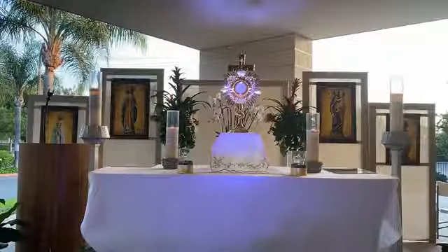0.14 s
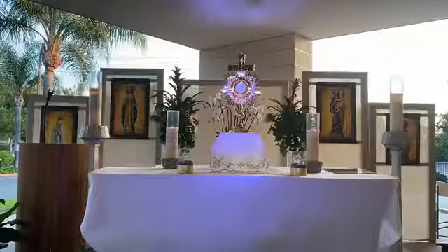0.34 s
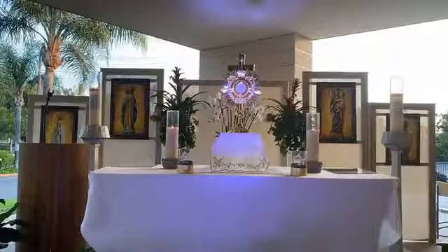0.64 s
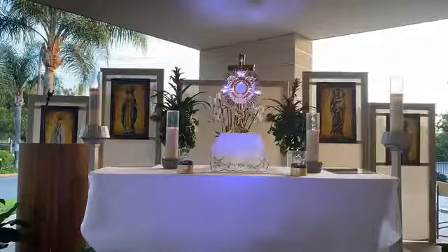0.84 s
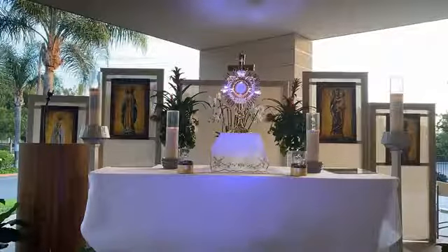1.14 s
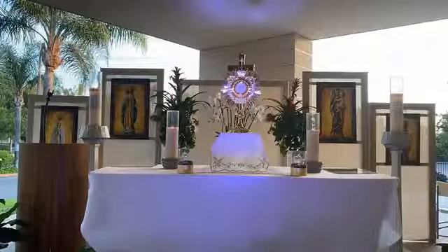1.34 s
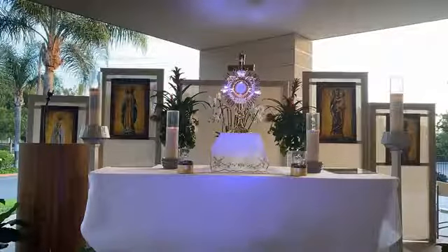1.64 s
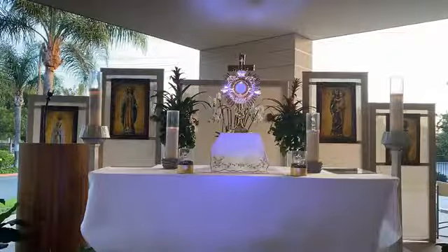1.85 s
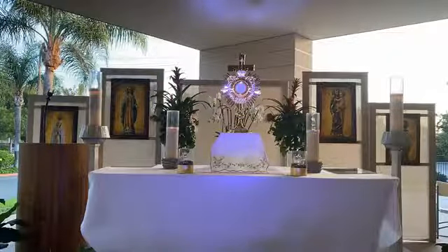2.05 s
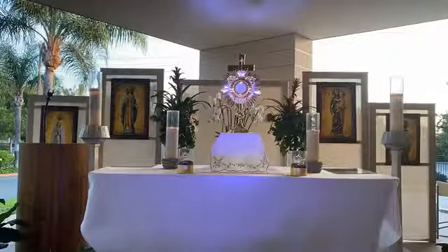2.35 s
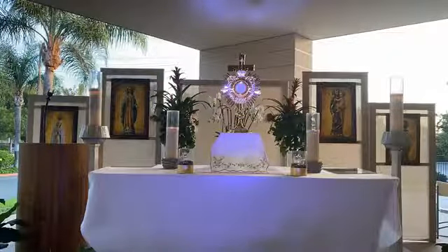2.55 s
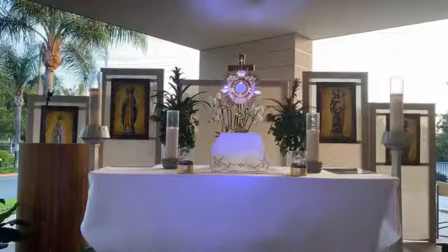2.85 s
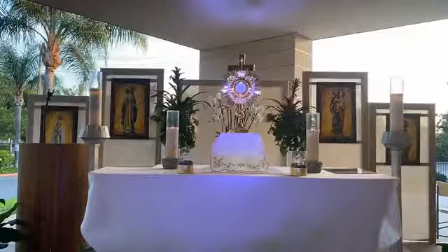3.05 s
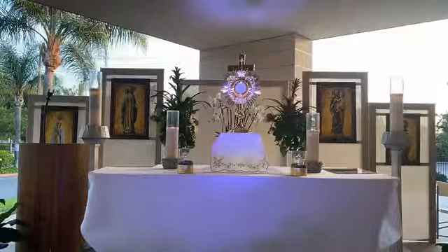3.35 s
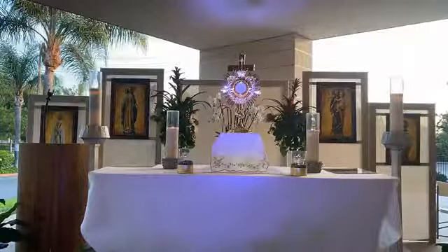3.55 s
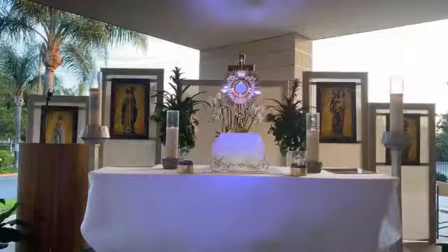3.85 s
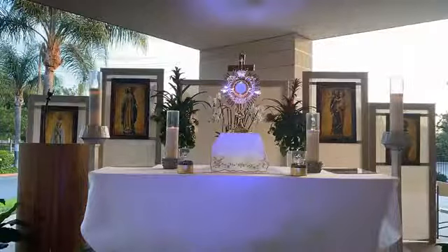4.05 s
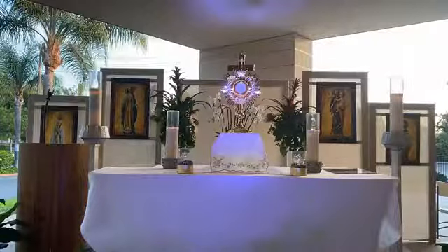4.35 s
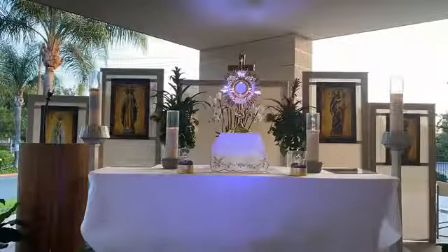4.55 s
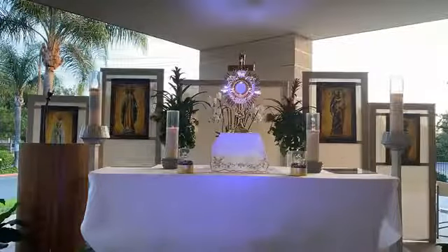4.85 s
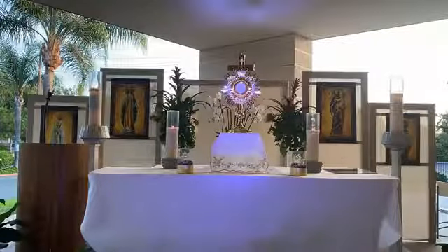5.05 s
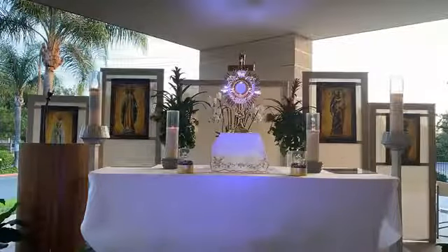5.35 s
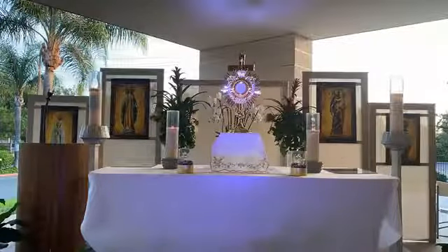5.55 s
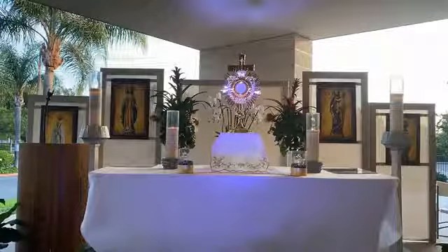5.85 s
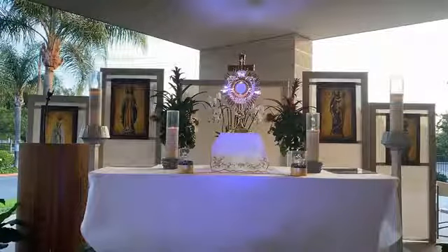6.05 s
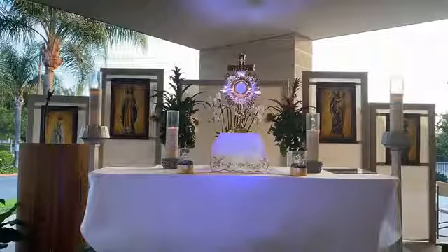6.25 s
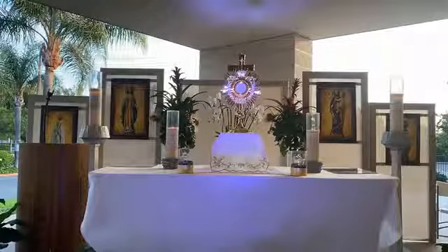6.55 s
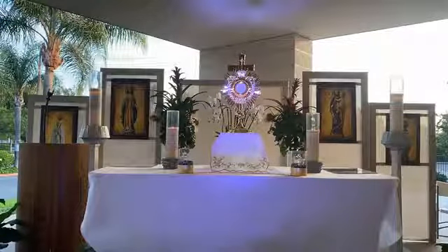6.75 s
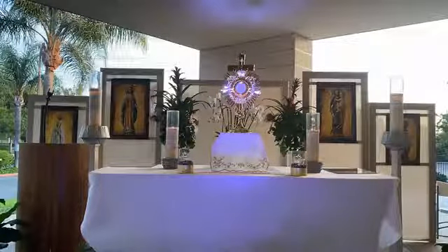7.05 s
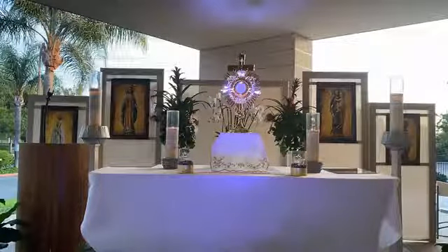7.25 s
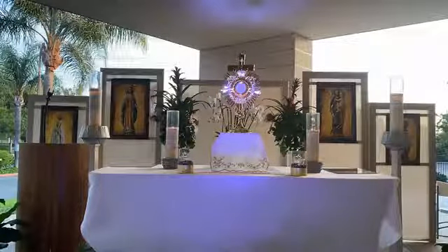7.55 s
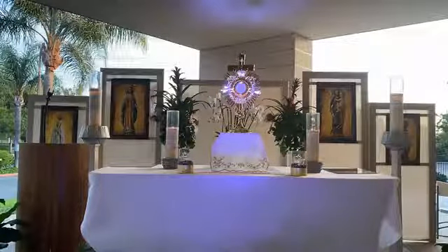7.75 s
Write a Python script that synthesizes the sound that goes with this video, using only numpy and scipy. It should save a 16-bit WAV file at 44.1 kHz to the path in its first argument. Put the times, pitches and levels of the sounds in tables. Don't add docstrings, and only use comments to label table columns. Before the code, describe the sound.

Constant broadband air hiss with wavering motor hum and thin, swelling fan whistles, over the soft low rumble of far road traffic. An engine note throbs past at the start, dips, returns weakly and fades away. Very low wind flutter presses on the single microphone, peaks past the middle, then dies. A farther engine shows briefly near six and seven seconds. Open-sided roofed place, nobody heard.

```python
import sys
import numpy as np
from scipy import signal
from scipy.fft import rfft, irfft
from scipy.io import wavfile
from scipy.ndimage import uniform_filter1d, map_coordinates

SR = 44100
rng = np.random.default_rng(int(sys.argv[2]) if len(sys.argv) > 2 else 0)


def output_pcm(signal):
    pcm = np.clip(np.atleast_2d(signal).T, -1, 1) * 32767
    wavfile.write(sys.argv[1], SR, np.round(pcm).astype(np.int16))


def elevation(decibels):
    levels = np.asarray(decibels, float)
    return 10 ** (levels / 20)


N = 347949


def in_time(rows):
    times_s, *columns = np.transpose(rows)
    return [np.interp(np.arange(N) / SR, times_s, column) for column in columns]


def coloured(spectrum):
    hz, db = np.transpose(spectrum)
    bins_hz = np.arange(N // 2 + 1) * SR / N + 1e-3
    gain = elevation(np.interp(np.log(bins_hz), np.log(hz), db, left=-200, right=-200))
    noise = irfft(rfft(rng.standard_normal(N)) * gain, N)
    return noise / noise.std()


def drift(rate_hz):
    return coloured([(0.1, 0.0), (rate_hz, 0.0), (4 * rate_hz, -24.0)])


def tone(hz, wander_hz, flicker_db):
    cycles = np.cumsum(hz + wander_hz * drift(2.82)) / SR
    phase = 2 * np.pi * (cycles + rng.random())
    return np.sqrt(2) * elevation(flicker_db * drift(3.3)) * np.sin(phase)


def swell(peak_s, half_s):
    return np.exp(-0.5 * ((np.arange(N) / SR - peak_s) / half_s) ** 2)


def same_line(a_hz, b_hz):
    return abs(np.log(a_hz / b_hz)) < 1 / 32


def traffic_rumble():
    # (frequency [Hz], level [dB per Hz])
    rumble_colour = [(14, -4), (32, -8), (50, 1), (66, -0.5), (80, 2), (105, 2), (135, -1), (170, -1),
                     (205, 1.5), (260, 1), (300, -9.5), (400, -24)]
    # (time [s], level [dB])
    density = [
        (0.0, -59),
        (1.43, -58.5),
        (2.24, -62.5),
        (5.82, -59.5),
        (7.89, -62),
    ]
    level_db, = in_time(density)
    return elevation(level_db) * coloured(rumble_colour)


def air_flow():
    # (frequency [Hz], level [dB per Hz])
    rush_colour = [(170, -30), (290, -3), (339, 1), (372, -3), (439, -3.5), (517, -3), (560, -1),
                   (669, -0.5), (719, -0.5), (872, -3.5), (1090, -1), (1270, -6), (1600, -14), (2080, -27),
                   (3520, -120)]
    # (frequency [Hz], level [dB per Hz])
    hiss_colour = [(820, -35), (1400, 0), (2300, -1), (3100, -2.5), (3900, -2), (4500, -4), (5200, -11.5),
                   (6300, -15.5), (7500, -21.5), (10000, -28), (10200, -31), (12300, -36.5), (13500, -38),
                   (17000, -41)]
    s = np.arange(N) / SR
    sag_db = 0.12 * s
    easing_db = 0.53 * np.maximum(s - 6.05, 0)
    flow_db = 0.39 * drift(10.4) - sag_db - easing_db
    rush = elevation(-57.5 + flow_db) * coloured(rush_colour)
    hiss = elevation(-55.5 + flow_db) * coloured(hiss_colour)
    return rush + hiss


def motor_hum():
    # (frequency [Hz], level [dB], beat period [s], weakest time [s], share of the second motor [0-1])
    motor_lines = [
        (119.8, -66.5, 9.4, 5.93, 0.6),
        (184.6, -67, 7.2, 3.17, 0.73),
        (240, -63, 6.5, 6.6, 0.16),
        (255.5, -64, 7.7, .3, 0.18),
    ]
    # (frequency [Hz], time [s], half length [s], loss [dB])
    dropouts = [(119.3, 2, 0.18, 3), (119.3, 7.15, .15, 9), (184.6, 1.7, 0.13, 7), (240.3, -0.5, .3, 14),
                (240.3, 1.1, 0.13, 6), (240.3, 7, .15, 3), (240.3, 5.95, .15, 4), (240.3, 9, 0.09, 6),
                (255.8, -0.6, .2, 7), (255.8, 1.3, .13, 5), (255.8, 2, 0.28, 4), (255.8, 5.5, 0.17, 3.5),
                (255.8, 6, 0.2, 9), (255.8, 8, .25, 8)]
    s = np.arange(N) / SR
    hum = 0
    for hz, db, period_s, weak_s, share in motor_lines:
        beat = np.abs(1 - share * np.exp(2j * np.pi * (s - weak_s) / period_s))
        loss_db = 0
        for line_hz, at_s, half_s, line_loss_db in dropouts:
            if same_line(line_hz, hz):
                loss_db = loss_db + line_loss_db * swell(at_s, half_s)
        hum = hum + elevation(db - loss_db) * beat * tone(hz, wander_hz=0.26, flicker_db=0.5)
    return hum


def fan_whistles():
    # (frequency [Hz], level [dB])
    resting = [
        (203.0, -83.5),
        (346.8, -83),
        (553.0, -80),
        (711, -75.5),
        (138.0, -83),
    ]
    # (frequency [Hz], peak time [s], half length [s], level [dB])
    whistle_swells = [(203.0, 0.59, 0.52, -65), (203.0, 2.38, 0.22, -62), (203.0, 3.6, 0.23, -76.5),
                      (203.0, 6.5, .45, -64.5), (203.0, 7.6, .3, -70), (346.4, 3.3, 1.5, -68),
                      (346.4, 6.27, .4, -69), (553.0, 0.93, 0.53, -70), (553.0, 2.29, 0.17, -67),
                      (553.0, 4.8, 1.2, -75), (710.5, .3, 0.36, -73), (710.5, 5.3, 0.75, -67),
                      (710.5, 7.02, 0.2, -65), (710.5, 7.9, .2, -64), (138.0, 0.38, .2, -61),
                      (138.0, 1.7, .2, -65), (138.0, 7.6, .2, -67.5)]
    whistles = 0
    for hz, rest_db in resting:
        strength = elevation(rest_db)
        for line_hz, peak_s, half_s, db in whistle_swells:
            if same_line(line_hz, hz):
                strength = strength + elevation(db) * swell(peak_s, half_s)
        whistles = whistles + strength * elevation(-3.5) * tone(hz, wander_hz=0.00299 * hz, flicker_db=1.5)
    return whistles


def faint_hum():
    # (frequency [Hz], level [dB], wander width [Hz])
    faint_lines = [(48.7, -74, 2.8), (76.8, -72.5, 1.56), (138.3, -75, 2.4), (223.8, -72, 1.03),
                   (268.6, -74.5, 0.93), (297, -82, 2.0), (317.5, -80, 4.0), (392, -77.5, 1.93),
                   (437.4, -83, 2.0), (481.5, -77.5, 1.8), (619, -75, 1.96), (746, -75, 2.0),
                   (816, -83.5, 1.9), (1134, -77.5, 1.94)]
    return sum(elevation(db) * tone(hz, wander_hz=width_hz, flicker_db=2.0) for hz, db, width_hz in faint_lines)


def passing_engine():
    # (time [s], firing pitch [Hz], level [dB])
    path = [
        (0.0, 109, -66),
        (0.41, 103, -64),
        (0.75, 95, -58.5),
        (1.3, 92.6, -55.5),
        (1.62, 92.3, -61.5),
        (2.05, 91.5, -59),
        (2.79, 89, -71),
        (3.8, 87, -60),
        (4.6, 81.8, -73),
    ]
    hz, db = in_time(path)
    s = np.arange(N) / SR
    fade = np.clip((path[-1][0] + 0.29 - s) / 0.45, 0, 1)
    throb_peak_s = 1.138
    throb_db = 4 * swell(throb_peak_s, half_s=0.8) * np.cos(2 * np.pi * 3.5 * (s - throb_peak_s))
    return fade * elevation(db + throb_db) * tone(hz, wander_hz=0.66, flicker_db=-1.0)


def evened(x, span_s):
    return x / np.sqrt(uniform_filter1d(x ** 2, size=int(span_s * SR)) + 0.047)


def softened(x, top_hz):
    return signal.sosfilt(signal.butter(4, top_hz, fs=SR, output="sos"), x)


def breeze():
    # (frequency [Hz], level [dB per Hz])
    push_colour = [(1.0, -9.5), (2.5, 3.5), (4.5, 5), (7, -10.5), (10, -7.5), (14, -40.5), (20, -41)]
    # (frequency [Hz], level [dB per Hz])
    flutter_colour = [(8, -15), (12, 0), (17, -5), (22, -16), (28, -24), (38, -26), (55, -45)]
    # (time [s], push [dB])
    gusts = [(.58, -46), (.98, -46), (1.35, -40.5), (1.7, -40), (2.02, -38.5), (2.37, -36), (2.78, -40.5),
             (3.07, -37), (3.5, -43), (3.87, -39.5), (4.35, -42.5), (4.78, -33.5), (5.15, -36.5),
             (5.4, -38), (5.62, -30), (5.93, -32.5), (6.3, -38), (6.92, -51), (7.35, -56), (7.8, -62)]

    def strength(lead_s):
        return elevation(-57) + sum(elevation(db) * swell(at_s - lead_s, half_s=0.099) for at_s, db in gusts)

    push = softened(strength(0) * evened(coloured(push_colour), 0.28), top_hz=11.2)
    flutter_gain = elevation(-62) * (100 * strength(0.11)) ** 1.8 + elevation(-71)
    flutter = softened(flutter_gain * evened(coloured(flutter_colour), 0.17), top_hz=45.5)
    return push + flutter


def far_engine():
    # (peak time [s], half length [s], level [dB])
    glimpses = [
        (5.75, 0.35, -66),
        (7.25, 0.11, -67),
    ]
    strength = sum(elevation(db) * swell(peak_s, half_s) for peak_s, half_s, db in glimpses)
    return strength * tone(95.0, wander_hz=1.2, flicker_db=3.5)


def whine():
    # (frequency [Hz], level of each tone [dB])
    whine_levels = [(10150, -112), (12000, -117), (15500, -122)]
    pattern_hz = 48000 / 1024
    hz, db = np.transpose(whine_levels)
    multiples = np.arange(hz[0] // pattern_hz, hz[-1] // pattern_hz)
    count = len(multiples)
    sizes = elevation(np.interp(pattern_hz * multiples, hz, db) + 2.8 * rng.standard_normal(count))
    cycle = np.arange(4096) / 4096
    starts = rng.random((count, 1))
    pattern = sizes @ np.sin(2 * np.pi * (np.outer(multiples, cycle) + starts))
    place = np.arange(N) * pattern_hz / SR % 1 * 4096
    return map_coordinates(pattern, [place], order=3, mode="grid-wrap")


def scene():
    air_unit = air_flow() + motor_hum() + fan_whistles() + faint_hum()
    engines = passing_engine() + far_engine()
    return (traffic_rumble() + air_unit + engines + breeze())[None]


def low_pass(x):
    return signal.sosfilt(signal.butter(12, 15760, fs=SR, output="sos"), x)


def record(dry):
    return low_pass(dry + whine())


dry = scene()
out = record(dry)
output_pcm(out)
```